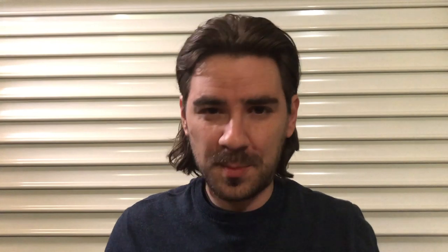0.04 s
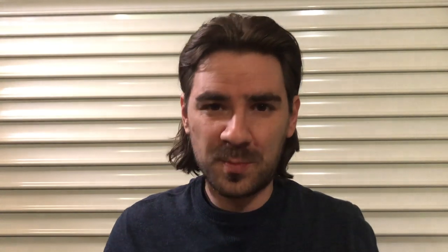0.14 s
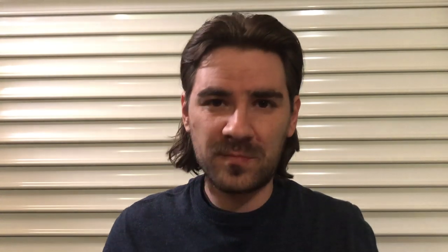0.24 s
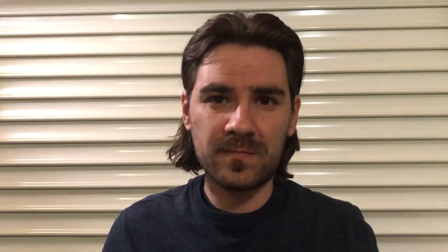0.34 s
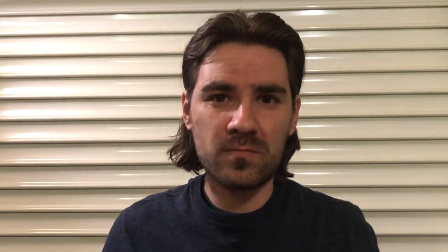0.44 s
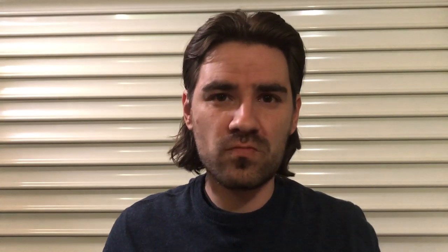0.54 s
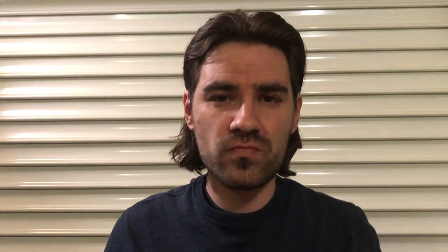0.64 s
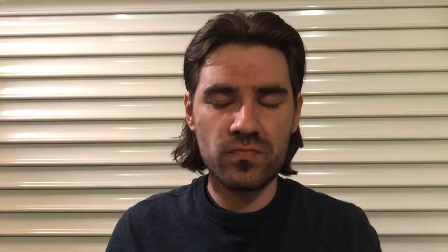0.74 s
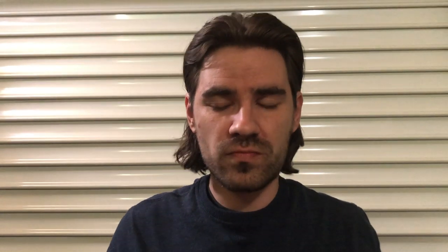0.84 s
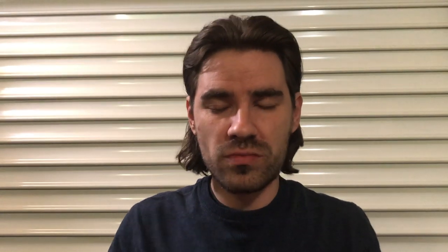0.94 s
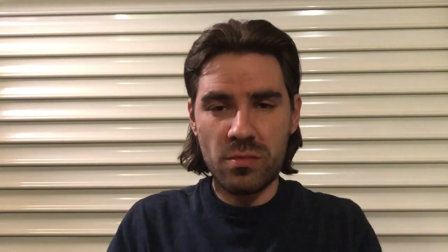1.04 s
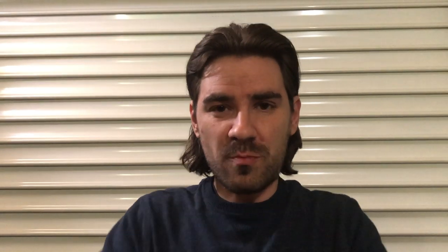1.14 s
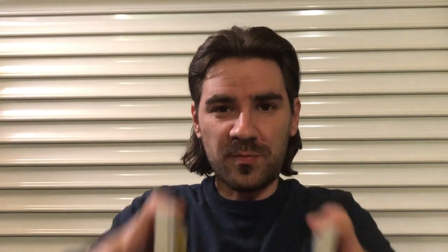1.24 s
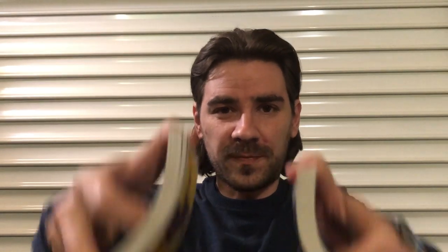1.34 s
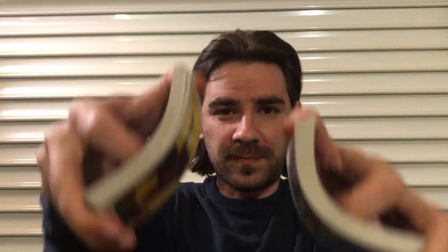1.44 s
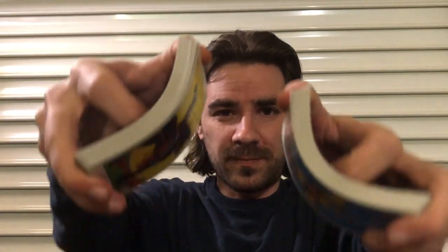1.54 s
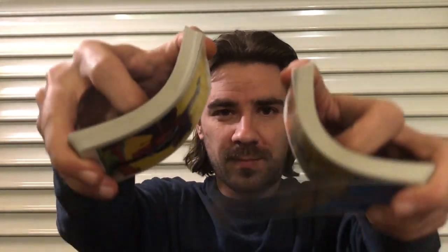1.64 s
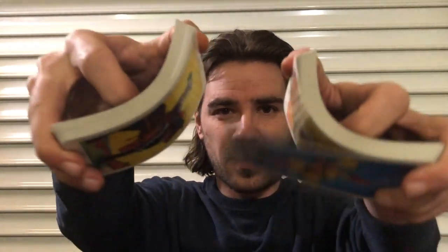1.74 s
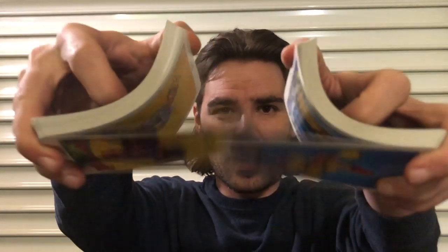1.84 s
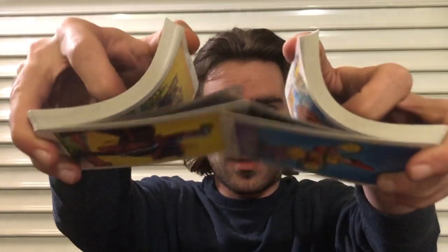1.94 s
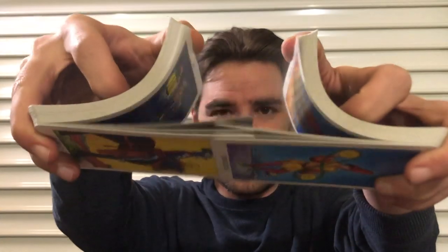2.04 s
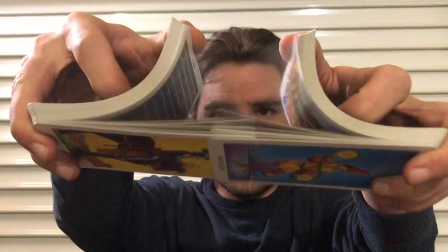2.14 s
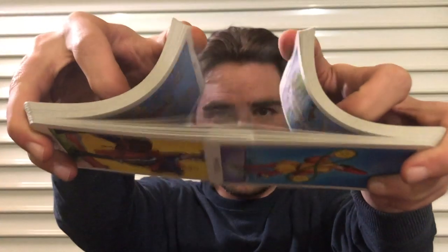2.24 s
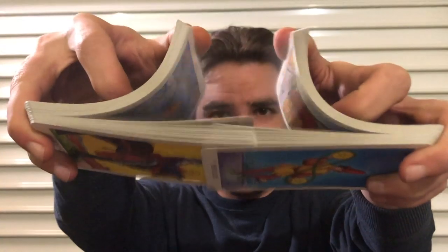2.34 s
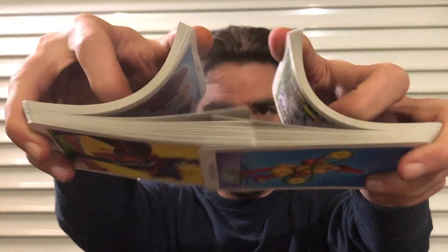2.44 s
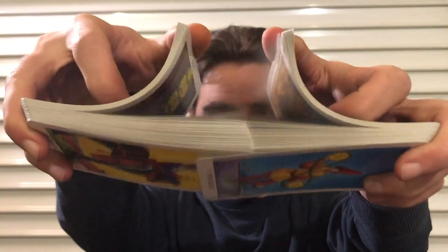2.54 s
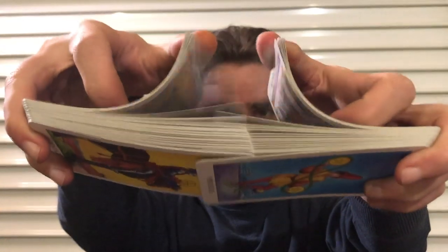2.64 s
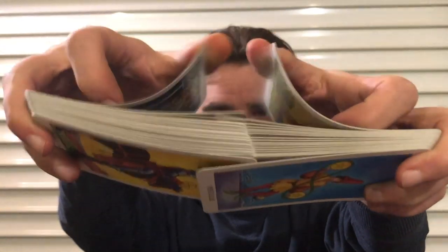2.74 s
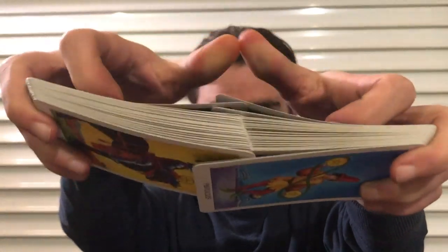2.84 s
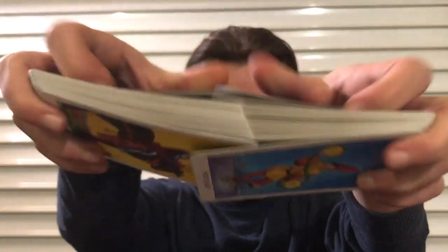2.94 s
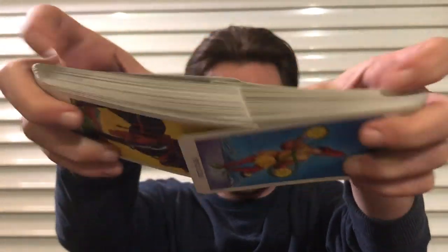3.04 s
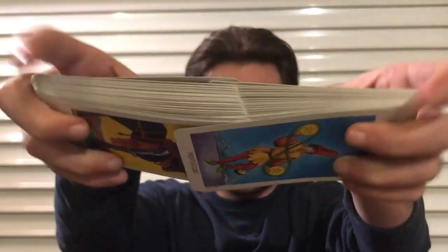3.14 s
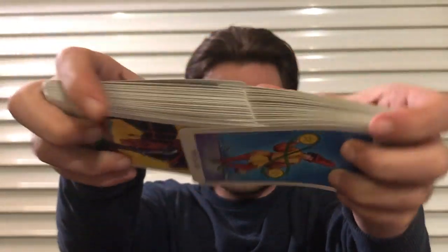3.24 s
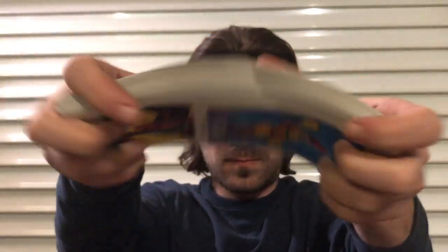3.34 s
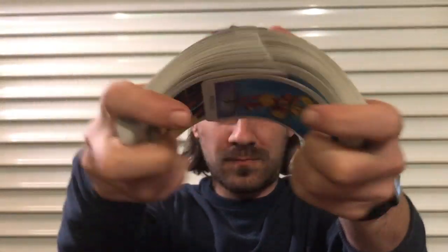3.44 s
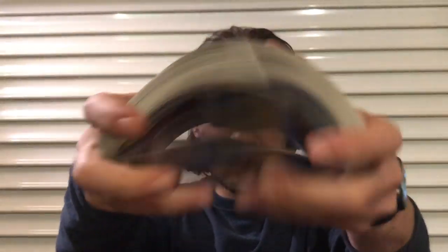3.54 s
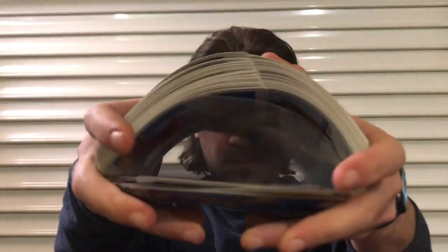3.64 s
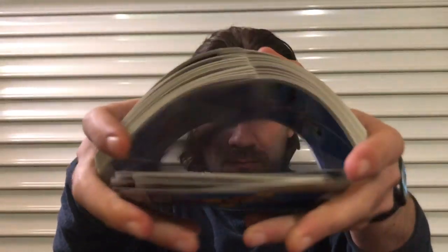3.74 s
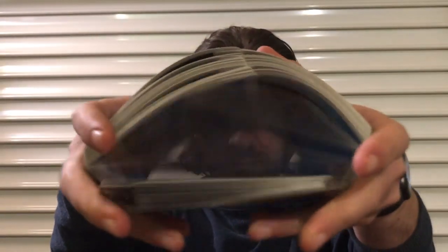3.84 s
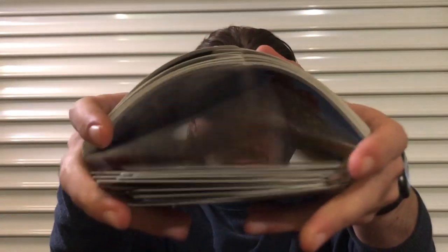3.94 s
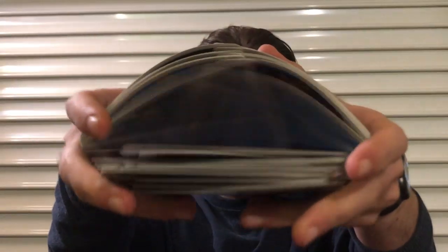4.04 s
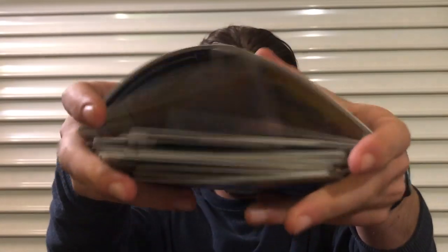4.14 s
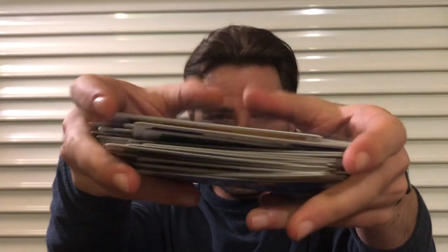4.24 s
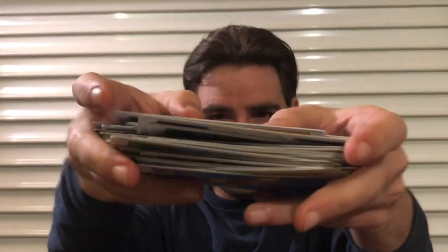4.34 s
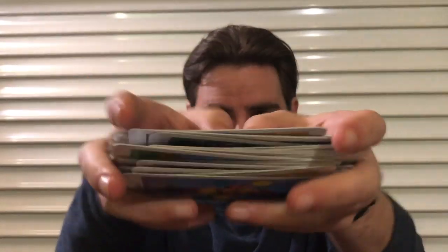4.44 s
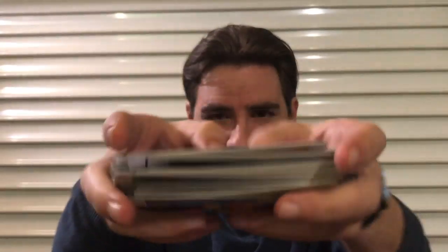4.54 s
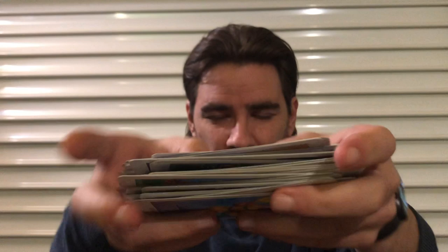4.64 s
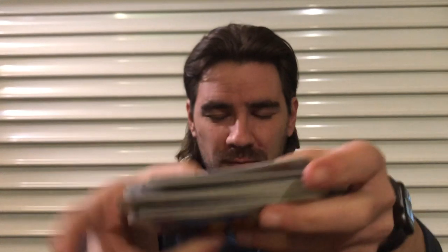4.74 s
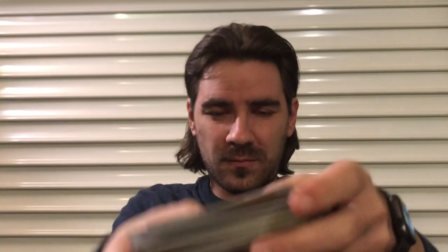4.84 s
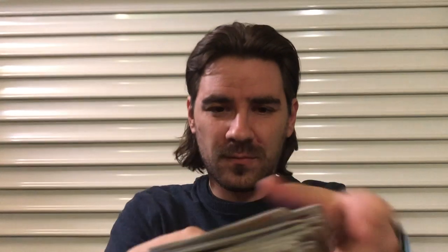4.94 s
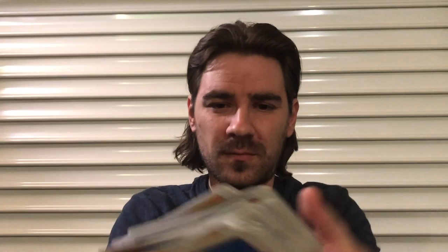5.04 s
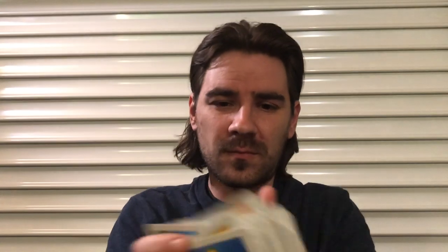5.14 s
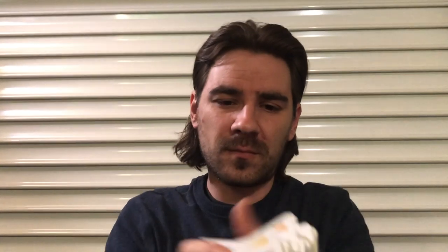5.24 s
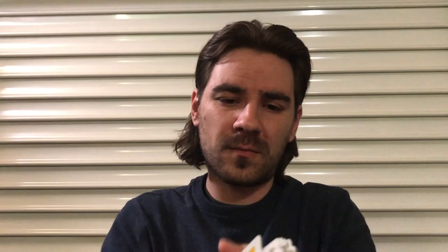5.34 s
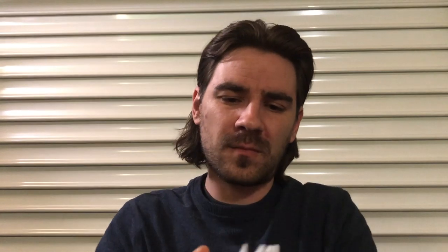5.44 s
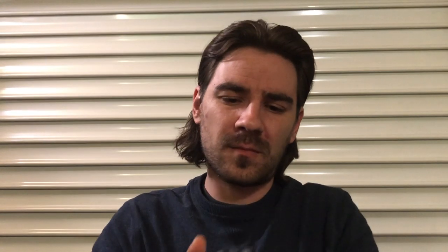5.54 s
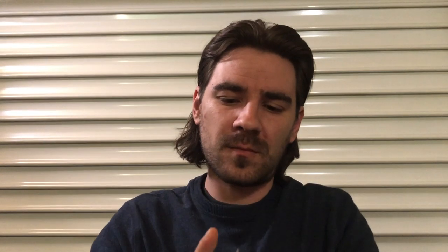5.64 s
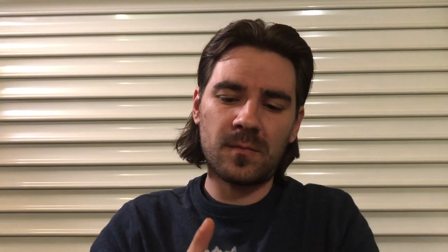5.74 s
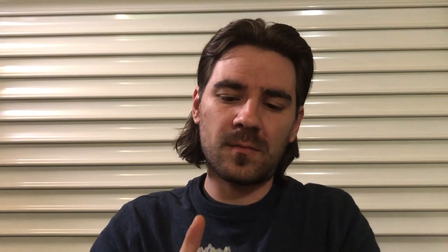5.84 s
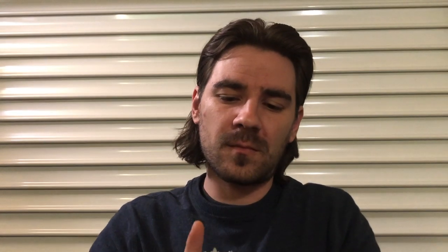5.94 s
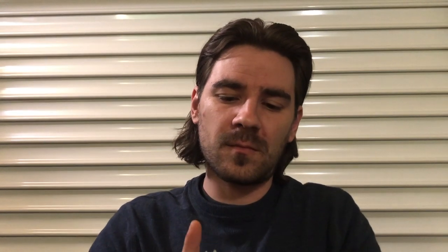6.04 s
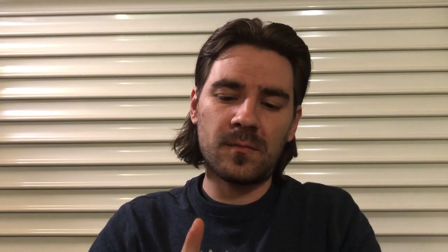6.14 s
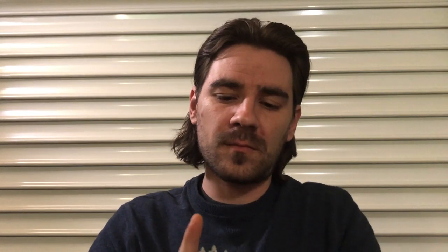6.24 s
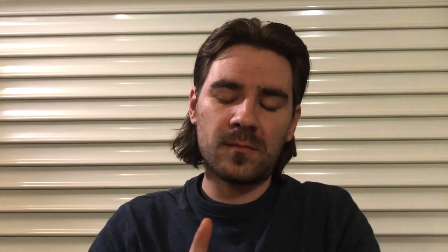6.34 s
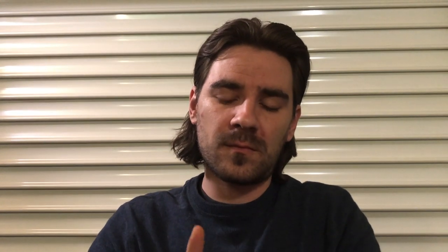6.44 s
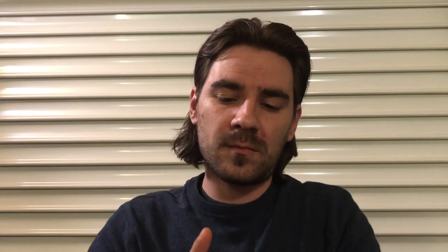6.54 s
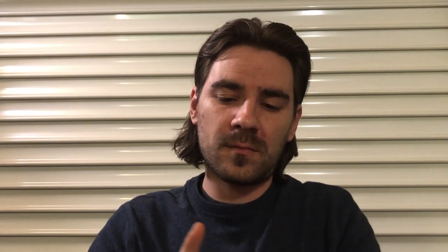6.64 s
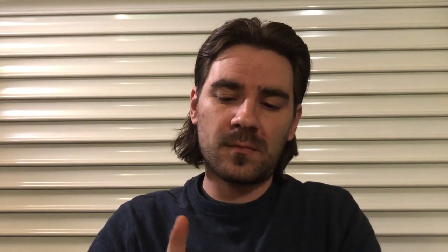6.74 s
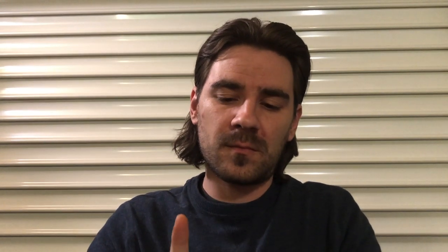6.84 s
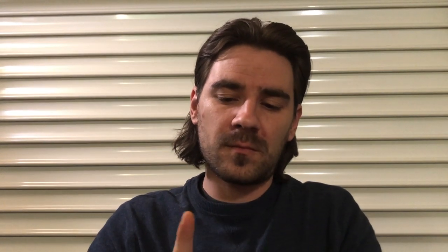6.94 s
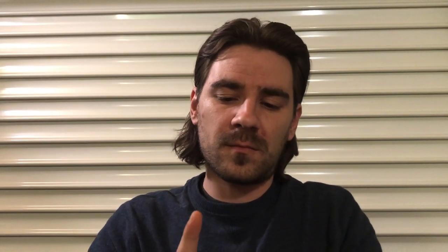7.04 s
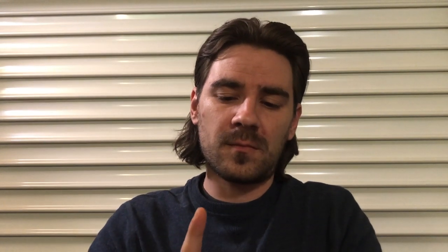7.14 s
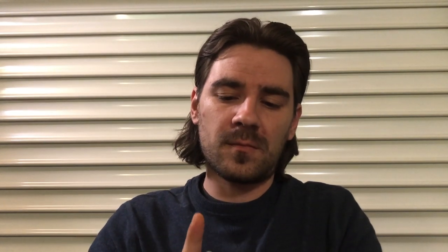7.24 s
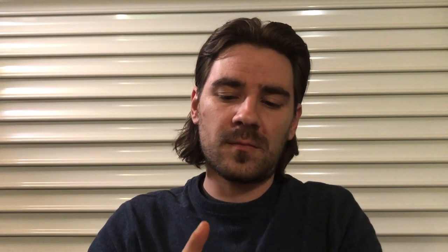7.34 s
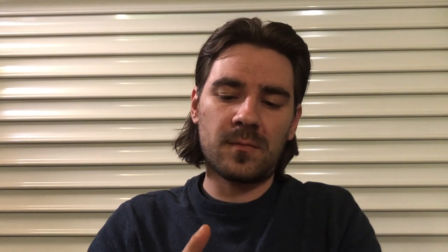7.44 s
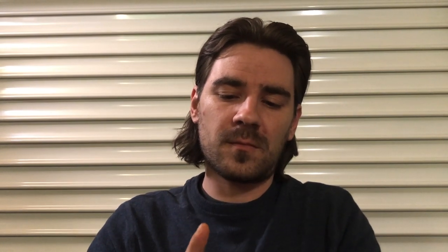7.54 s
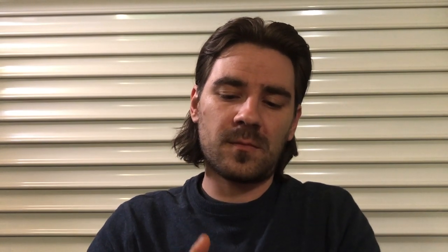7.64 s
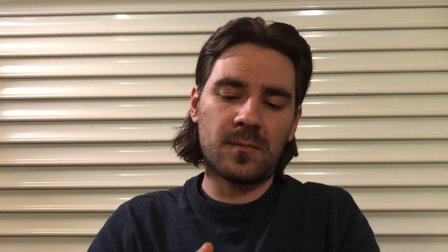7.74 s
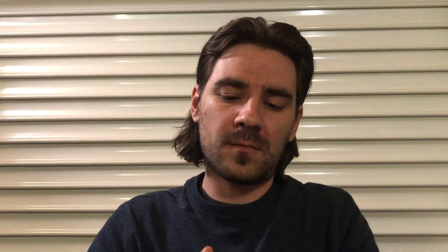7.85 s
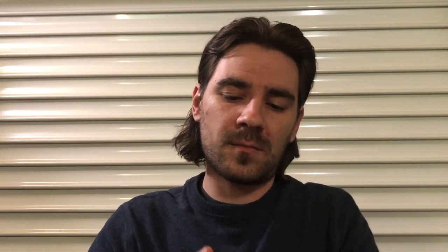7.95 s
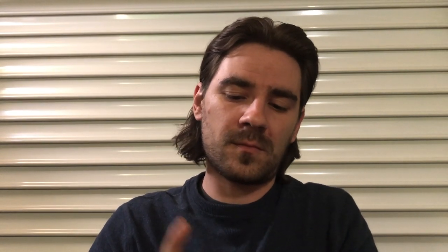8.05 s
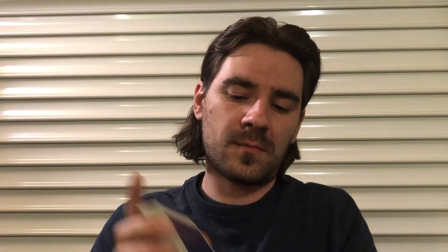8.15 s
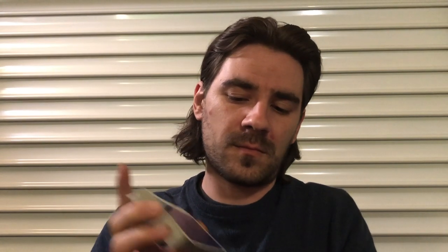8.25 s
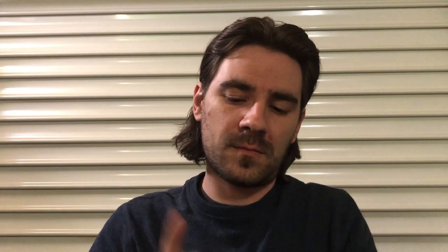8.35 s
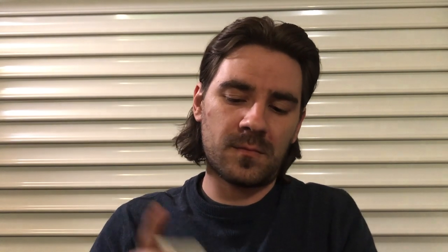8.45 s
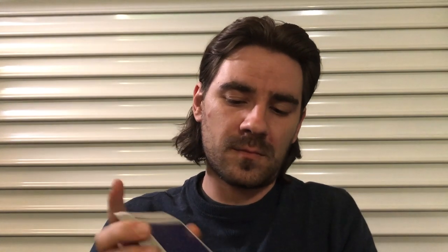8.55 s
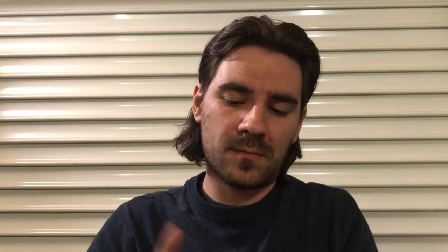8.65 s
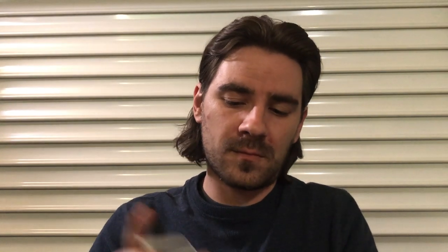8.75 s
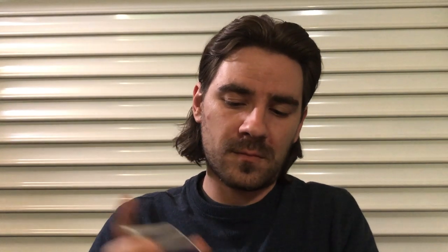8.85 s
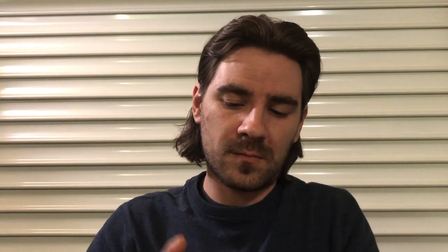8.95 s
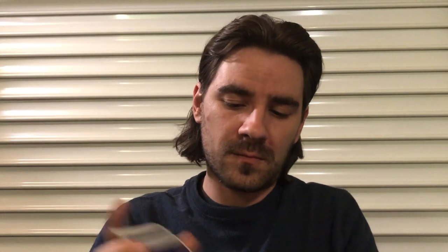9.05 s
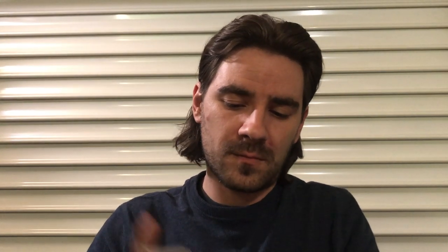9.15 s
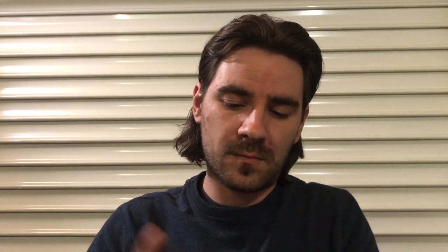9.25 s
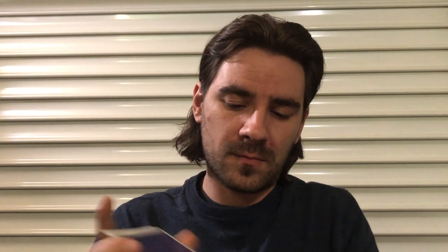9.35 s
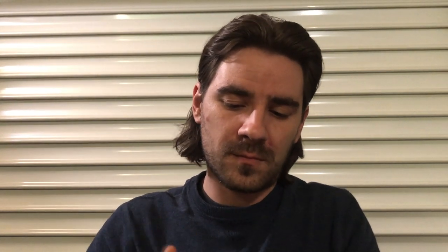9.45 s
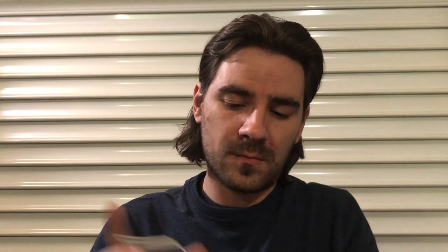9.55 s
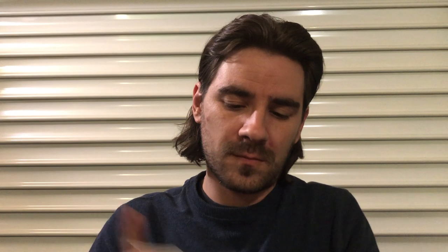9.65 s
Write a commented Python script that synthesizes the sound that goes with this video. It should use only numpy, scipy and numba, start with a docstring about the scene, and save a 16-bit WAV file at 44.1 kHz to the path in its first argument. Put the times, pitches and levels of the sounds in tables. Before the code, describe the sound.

Faint taps over low room rumble and hiss lead to a bright, dense burst of card edges snapping off thumbs. A second burst follows, fuller and papery, as the arch springs closed with a few hard cracks. Gentle rubbing and light taps follow, then quiet. Finally five thin flicks, each with a short gritty slide and parting tick, sound slightly roomier and more distant.

```python
"""A faint whistle and light taps, then a blip as two packets of a tarot deck are bent back and riffled close by.
Card edges scrape and snap free, each click spreading as a bending wave; cards slap the pile and rub.
The deck is arched into a bridge, springs shut with puffs of air and is squared with soft strokes.
Last, further off, five cards are drawn one by one: flick, slide, parting tick, ring of the cupped hand.
A small room answers throughout, over rumble, hiss, hum and a high whine."""
import sys
import numpy as np
from scipy import signal
from scipy.fft import rfft, irfft, next_fast_len
from scipy.io import wavfile
from scipy.ndimage import uniform_filter1d
from numba import njit

SR = 44100
rng = np.random.default_rng(int(sys.argv[2]) if len(sys.argv) > 2 else 0)


def transcribe(signal):
    """Save signal, clipped to [-1, 1], as a 16-bit WAV file at the path in sys.argv[1]."""
    frames = np.atleast_2d(signal).T
    limited = np.clip(frames, -1, 1)
    pcm = np.round(limited * 32767).astype(np.int16)
    wavfile.write(sys.argv[1], SR, pcm)


N = 427769
T = np.arange(N) / SR  # s
SIZE = 4096  # samples in one click
BINS = np.maximum(np.arange(SIZE // 2 + 1) * SR / SIZE, 1)  # Hz


def undb(db):
    """Decibels to gain."""
    return 10 ** (np.asarray(db) / 20)


def on_log(hz, points):
    """Read (Hz, value) points on a log-frequency axis."""
    f, value = np.transpose(points)
    return np.interp(np.log(np.maximum(hz, 1)), np.log(f), value)


def colour(x, points):
    """Filter a sound by (Hz, dB) points."""
    n = next_fast_len(len(x) + SIZE)
    gain = undb(on_log(np.fft.rfftfreq(n, 1 / SR), points))
    return irfft(rfft(x, n) * gain, n)[:len(x)]


def unit(x):
    """Scale to rms 1."""
    return x / np.sqrt(np.mean(x ** 2))


def walk(rate_hz):
    """Smooth random wander of rms 1, with rate_hz new knots per second."""
    knots = rng.standard_normal(4 * SIZE)
    return unit(np.interp(T * rate_hz, np.arange(len(knots)), knots))


def add(out, s, x):
    """Mix x into out from time s."""
    i = int(s * SR)
    out[i:i + len(x)] += x[:N - i]


@njit
def resonator(x, hz, width_hz):
    """Band-pass with a moving centre and gain 1 there."""
    y, band, low = np.empty(len(x)), 0., 0.
    for i in range(len(x)):
        g, k = np.tan(np.pi * hz[i] / SR), width_hz / hz[i]
        v = (band + g * (x[i] + 1e-18 - low)) / (1 + g * (g + k))
        band, low, y[i] = 2 * v - band, low + 2 * g * v, k * v
    return y


def thud(hz, decay_ms):
    """A heavily damped resonance that swells for one decay time; peak near 1."""
    t = T[:SIZE]
    age = t * 1000 / decay_ms
    return age * np.exp(1 - age) * np.sin(2 * np.pi * hz * t)


def bend(spectrum, lag_ms):
    """Bending waves travel as the root of frequency, so a click chirps downwards; lag_ms is the lag at 1 kHz."""
    return irfft(spectrum * np.exp(-4j * np.pi * lag_ms * np.sqrt(BINS / 1000)))


def scrape(length_ms):
    """Spectrum of a brief rough release, evened out to be flat on the whole."""
    ms = np.arange(SIZE) * 1000 / SR
    # the edge takes a moment to roll off the skin, then scrapes on
    grip = (1 - np.exp(-ms / 0.76)) * np.exp(-ms / (length_ms + 0.081))
    burst = rfft(rng.standard_normal(SIZE) * grip)
    return burst / np.sqrt(uniform_filter1d(abs(burst) ** 2, size=200))


# Loudest card edges slipping off the thumbs. Each row: time in seconds, level in dB, scrape length in ms.
RIFFLE = [(1.7965, -20, 3.7), (1.8434, -2.5, 3.2), (1.8866, -3.5, 0.91), (1.9058, 1.6, 7.5),
          (1.9641, 7, 0.61), (1.9945, 1.5, 8.1), (2.0487, 4, 2.7), (2.0857, 3, 3.8), (2.1308, -4.5, 1.8),
          (2.1702, 3, 1.7), (2.188, -8, 0.26), (2.2257, 10.5, 0.82), (2.307, 1, 7.2), (2.3232, -7.5, 0.075),
          (2.358, 4, 0.2), (2.3643, -5, 2.5), (2.4079, 6, .3), (2.426, -3, 3.34), (2.4559, 9.5, 0.4),
          (2.4658, 3, 2.3), (2.5443, 4.5, 4), (2.5628, -1, 0.1), (2.6114, 0.5, 3.8), (2.63, 2, 7.9),
          (2.6781, 0.5, 0.18), (2.7355, -1.5, 3.4), (2.7829, 2, 5.1), (2.7961, -5.5, 1.1),
          (2.8418, -0.5, 0.62)]
# Loudest clumps of cards springing out of the arch. Each row: time in seconds, level in dB, scrape length in ms.
BRIDGE = [(3.5884, 1.5, .4), (3.6139, 2, 3.1), (3.6385, -3.5, 2.6), (3.6603, 0, 1.6), (3.6977, -4, 4),
          (3.7256, 0, 4.4), (3.738, -1, .5), (3.758, -.5, 5), (3.7751, -6.5, 4), (3.8716, -2.5, 1.8),
          (3.8955, 3, 4.7), (3.9125, 13, 0.38), (3.9259, 8, 0.83), (3.9429, 15.5, 0.13), (3.98, 2.5, 4.5),
          (4.0192, -2, 0.53), (4.0484, -5, 3.9), (4.1005, -1, 2.6), (4.1173, 3.5, 2.1), (4.2019, 2.5, 4.5)]
# Spectrum of a snapping edge. Each row: frequency in Hz, gain in dB.
SNAP_COLOUR = [(40, -21), (120, 1.5), (300, -2.5), (700, 0.5), (1400, -1.5), (2300, 1), (4300, -1),
               (7000, 1), (11000, 0), (16000, -3.5)]
BASS_LOSS_DB_PER_DB = 0.5  # a harder snap gains little bass


def snaps(rows, lag_ms, drag_db, bass_db, treble_db, dulling_db, thinning_db_per_s=0):
    """Card edges drag over a finger and slip off; returns the direct sound and what the walls receive.
    Treble falls by dulling_db per doubling of the scrape, bass by thinning_db_per_s; negative values raise it."""
    direct, spread = np.zeros(N), np.zeros(N)
    for s, level_db, length_ms in rows:
        bass = bass_db - BASS_LOSS_DB_PER_DB * level_db - thinning_db_per_s * (s - rows[0][0])
        treble = treble_db - dulling_db * np.log2(length_ms)
        tilt = on_log(BINS, [(650, bass), (1700, 0), (3400, 0), (8000, treble)])
        tone = undb(level_db + tilt + on_log(BINS, SNAP_COLOUR))
        add(direct, s - .0007, bend(scrape(length_ms) * tone, lag_ms))
        # the drag swells up to the moment of release
        drag = undb(drag_db) * irfft(scrape(2.5) * tone)[:SIZE // 4]
        add(direct, s - len(drag) / SR, drag[::-1])
        # summed over all directions, the ripple in the scrape's spectrum evens out
        add(spread, s, bend(tone, lag_ms))
    return direct, spread


# Packets interleaving, then the arch running down. Each row: start in seconds, end in seconds,
# first level in dB, last level in dB.
SLIDES = [(1.899, 2.833, -57, -47), (3.589, 4.22, -38.5, -42)]


def pressure(start_s, end_s, first_db, last_db):
    """A slide starts and stops abruptly and swells or fades evenly in between."""
    gain = undb(np.interp(T, [start_s, end_s], [first_db, last_db]))
    return uniform_filter1d(gain * (T > start_s) * (T < end_s), size=130)


# Spectrum of card rubbing on card. Each row: frequency in Hz, gain in dB.
RUB_COLOUR = [(40, -10.5), (200, 0.5), (600, -7.5), (1200, -0.5), (2400, 0.5), (4500, 0), (8000, 0.5),
              (12000, -0.5), (16000, -10.5)]


def friction(grain, patchy_db):
    """Paper fibres catch and let go: dense grains of uneven size under wavering pressure."""
    grains = rng.standard_normal(N) * np.exp(grain * walk(1500))
    return unit(colour(grains, RUB_COLOUR) * undb(patchy_db * walk(110)))


# Hollow between the two packets. Each row: time in seconds, lowest resonance in Hz.
HOLLOW = [(1.85, 1380), (2.0, 1500), (2.23, 1410), (2.46, 1770), (2.8, 1810)]
# Its modes. Each row: multiple of the lowest resonance, width in Hz, level in dB at the start of the riffle,
# level in dB at its end.
HOLLOW_MODES = [(1, 99.84, 7.5, -12), (1.62, 140.1, -0.5, 1.5)]


def shuffle(riffle, bridge, wobble=0.075):
    """Snaps and rubbing ring the hollow between the flexing packets, then the air under the arched deck."""
    hz = np.interp(T, *np.transpose(HOLLOW)) * (1 + wobble * walk(30))
    hollow = 0
    for multiple, width_hz, first_db, last_db in HOLLOW_MODES:
        gain = undb(np.interp(T, SLIDES[0][:2], [first_db, last_db]))
        hollow = hollow + gain * resonator(riffle, hz * multiple, width_hz * 1.)
    arch = resonator(bridge, np.full(N, 275.), 110.)
    return riffle + hollow + bridge + undb(-1.5) * arch


# Spectrum of a card slapping the pile. Each row: frequency in Hz, gain in dB.
SLAP_COLOUR = [(25, -14.5), (55, -3), (110, 0.5), (260, 3.5), (700, -7), (1500, -9.5), (3000, -17),
               (12000, -31)]
FALL_S, FALL_SPREAD_S = 0.022, 0.002  # mean and rms spread of the fall
SLAP_FOLLOW_DB_PER_DB = 0.76  # slap level per snap level


def slaps(lag_ms, db):
    """Each card freed in the riffle lands on the pile a moment later: a dull, slow chirp."""
    out = np.zeros(N)
    for (s, level_db, _), late in zip(RIFFLE, rng.standard_normal(len(RIFFLE))):
        force = undb(db + SLAP_FOLLOW_DB_PER_DB * level_db + on_log(BINS, SLAP_COLOUR))
        add(out, s + FALL_S + FALL_SPREAD_S * late, bend(force, lag_ms))
    return out


def flutter(span, rate_hz, slap_db, tick_db, spread_db):
    """Lighter cards tick and flap down between the loud ones, at random moments in evenly spaced slots."""
    out = np.zeros(N)
    start_s, end_s = span[:2]
    for k, (when, size, lag) in enumerate(rng.random((100, 3))):
        s = start_s + (k + when) / rate_hz
        edge = scrape(0.1 + 2 * lag)
        if s < end_s:
            slap = undb(slap_db + spread_db * size + on_log(BINS, SLAP_COLOUR))
            tick = edge * undb(tick_db + spread_db * size + on_log(BINS, SNAP_COLOUR))
            add(out, s, bend(slap, 2 + 2 * lag))
            add(out, s, bend(tick, 1.2))
    return out


def rasp(start_s, end_s, fade_s, hz, width_hz, db):
    """Midway through the riffle each stiffly bent edge scratches brightly along the thumb as it snaps free."""
    drag = sum(undb(level_db) * (T > s) * np.exp(-abs(T - s) / fade_s)
               for s, level_db, _ in RIFFLE if start_s < s < end_s)
    scratch = resonator(friction(grain=0.7, patchy_db=2.0), np.full(N, hz * 1.), width_hz * 1.)
    return undb(db) * drag * unit(scratch)


# Air squeezed out as the bridge closes. Each row: time in seconds, level in dB, pitch in Hz.
PUFFS = [(4.142, -37, 89.5), (4.261, -35.5, 118), (4.287, -44.5, 230), (4.301, -43.5, 80)]


def puffs(decay_ms):
    """Low, quickly damped pushes of air from the closing deck."""
    out = np.zeros(N)
    for s, db, hz in PUFFS:
        add(out, s, undb(db) * thud(hz, decay_ms))
    return out


def squeak(s, length_s, low_hz, high_hz, rough, db):
    """A brief, rough rising blip as the packets are bent back."""
    hz = np.interp(T, [s, s + length_s], [low_hz, high_hz])
    push = np.exp(-(2 * (T - s) / length_s - 1) ** 2) * (1 + rough * walk(1100))
    return undb(db) * push * np.sin(2 * np.pi * np.cumsum(hz) / SR)


# Single cards drawn off the deck. Each row: flick time in seconds, slide before it in seconds,
# slide after it in seconds, flick level in dB, flick scrape length in ms, slide level in dB,
# parting tick level in dB, hand resonance in Hz, ring level in dB.
DRAWS = [(8.3947, .016, .089, -5.5, 1.5, -49.5, -21, 1410, -31),
         (8.6681, 0.0021, .1408, -21, 6.6, -49.5, -20.5, 1490, -43.5),
         (8.9293, 0.002, .1175, -13.5, 4, -47.5, -18, 2380, -51),
         (9.2052, 0.0013, 0.089, -5, 0.31, -46.5, -21.5, 2740, -22),
         (9.458, 0.0034, 0.11, -13, 1.16, -53, -22, 980, -30.5)]
# Light taps as the deck is gripped and turned over. Each row: time in seconds, tick level in dB,
# hand resonance in Hz, ring level in dB.
TAPS = [(0.317, -48, 3520, -51), (0.9866, -29, 2000, -50), (1.62, -23, 636, -43), (3.4927, -12, 686, -40),
        (4.838, -31.5, 3500, -57), (5.1624, -32, 704, -56.5), (5.2882, -21.5, 960, -40.5),
        (5.6263, -27.5, 2700, -48)]
LEAVE_MS = 2.6  # scrape length of a card ticking off the last edge


def handling():
    """Taps on the deck, flicks and parting ticks of drawn cards; direct sound and what the walls receive."""
    flicks = [(s, db, ms) for s, _, _, db, ms, *_ in DRAWS]
    partings = [(s + after_s, db, LEAVE_MS) for s, _, after_s, _, _, _, db, _, _ in DRAWS]
    taps = [(s, db, 1.2) for s, db, *_ in TAPS]
    parts = (snaps(flicks, lag_ms=1.048, drag_db=-18, bass_db=-8.0, treble_db=-8, dulling_db=-1.5,
                   thinning_db_per_s=-8),
             snaps(partings, lag_ms=1.034, drag_db=-3, bass_db=-7, treble_db=-8, dulling_db=-0.5),
             snaps(taps, lag_ms=1.1, drag_db=-12.0, bass_db=-16, treble_db=-7.5, dulling_db=-2.5))
    tone = [(110, -11.5), (240, 4), (420, -0.5), (900, 1), (2800, -0.5), (6000, -0.5), (14000, 0)]
    return [colour(sum(x), tone) for x in zip(*parts)]


RING_CYCLES = 0.7  # decay time in cycles


def cupped_hand():
    """Each tap or flick briefly rings the air trapped under the cards."""
    out = np.zeros(N)
    for s, *_, hz, db in list(TAPS) + list(DRAWS):
        add(out, s, undb(db) * thud(hz, 1000 * RING_CYCLES / hz))
    return out


DRAW_FADE_DB = 8  # loss over one slide


def drawn_slides(db, ring_db, width_hz):
    """A card slides off the deck, gritty and hissing; the rubbing is coloured by the hollow of the hand."""
    rub = colour(friction(grain=0.55, patchy_db=2), [(500, 1.5), (3000, 2), (7000, -2), (14000, 1.0)])
    out = np.zeros(N)
    for s, before_s, after_s, _, _, slide_db, _, hz, _ in DRAWS:
        slide = rub * pressure(s - before_s, s + after_s, slide_db, slide_db - DRAW_FADE_DB)
        out += slide + undb(ring_db) * resonator(slide, np.full(N, hz * 1.), width_hz * 1.)
    return undb(db) * out


# Soft strokes of gripping and squaring the deck. Each row: centre in seconds, half length in seconds,
# level in dB, tilt above 1500 Hz in dB per octave.
SWISHES = [(3.019, 0.05, -55, -2.5), (3.425, 0.11, -60, -3), (3.55, 0.04, -37, 1.5), (4.426, .047, -53, 0),
           (4.59, 0.045, -67.5, -2), (4.916, 0.021, -64.5, -4), (5.186, 0.021, -59.5, 0.5),
           (5.273, .017, -53.5, 0), (5.348, .035, -65.5, 1), (5.779, 0.058, -63, 1.5),
           (5.863, 0.024, -62, 0), (6.05, 0.039, -62, 5), (6.237, .07, -63, 2), (6.35, 0.038, -64, 2.5),
           (6.705, 0.066, -65.5, 3), (8.034, 0.037, -65, -5), (8.116, 0.036, -63, -1),
           (8.223, .035, -68.5, -2.5)]


def swishes():
    """Soft strokes of fine-grained friction swell and fade, each with its own treble tilt."""
    out = np.zeros(N)
    tone = [(300, 2.5), (1500, -1), (4000, 3.5), (12000, 2.0), (16000, 7.5)]
    soft = colour(friction(grain=0.27, patchy_db=2.5), tone)
    for s, half_s, db, tilt in SWISHES:
        during = abs(T - s) < 3 * half_s
        stroke = unit(colour(soft[during], [(1500, 0), (16000, tilt * np.log2(16000 / 1500))]))
        out[during] += undb(db) * stroke * np.exp(-((T[during] - s) / half_s) ** 2)
    return out


def whistle(s, half_s, hz, db):
    """A thin, very faint sine with wandering phase, just before the cards come up."""
    return undb(db) * np.exp(-((T - s) / half_s) ** 2) * np.sin(2 * np.pi * hz * T + walk(40))


# Room decay. Each row: frequency in Hz, time to fall 60 dB in seconds.
ROOM_T60 = [(200, 0.14), (1200, .25), (5000, .26), (15000, 0.13)]
# Spectrum of the room tail. Each row: frequency in Hz, gain in dB.
ROOM_COLOUR = [(60, -1), (250, 0), (600, 1.5), (1500, 0), (2500, 0), (5000, -0.5), (9000, -1), (16000, 3.5)]


def room(x, build_s):
    """A small room: a diffuse noise tail with its own decay time in each band."""
    t = T[:SR // 2]
    noise, f = rfft(rng.standard_normal(len(t))), np.fft.rfftfreq(len(t), 1 / SR)
    centres_hz = np.array(ROOM_T60)[:, 0]
    tail = 0
    for (_, t60_s), share in zip(ROOM_T60, np.eye(len(ROOM_T60))):
        band = on_log(f, list(zip(centres_hz, share)))
        tail = tail + irfft(noise * band, len(t)) * np.exp(-np.log(1000) * t / t60_s)
    tail = colour(tail, ROOM_COLOUR) * (1 - np.exp(-t / build_s))
    return signal.fftconvolve(x, tail / np.sqrt(np.sum(tail ** 2)))[:N]


def moving_room(x, count=4):
    """The hands keep moving, so the pattern of reflections drifts from one shape to another."""
    shares = np.array([walk(14) for _ in range(count)])
    shares /= np.sqrt(np.sum(shares ** 2, axis=0))
    return sum(room(x * share, build_s=0.0014) for share in shares)


# Spectrum of room rumble and microphone hiss. Each row: frequency in Hz, gain in dB.
QUIET = [(15, -38.5), (25, -10), (102, -3.5), (123, -7), (212, -7), (263, -9), (591, -14), (1130, -20.5),
         (7920, -29), (9840, -29.5), (16000, -29.5)]
QUIET_DB = -69.5  # before the low cut in scene()


def background(hum_hz, hum_db, whine_hz, whine_db):
    """Room rumble and microphone hiss, with a wavering hum and a faint high whine of narrow noise."""
    air = unit(colour(rng.standard_normal(N), QUIET)) * undb(QUIET_DB + .5 * walk(8.5))
    hum = np.sin(2 * np.pi * hum_hz * T + walk(1.3)) * undb(hum_db + 2 * walk(1.0))
    whine = unit(resonator(rng.standard_normal(N), np.full(N, whine_hz * 1.), 300.))
    return air + hum + undb(whine_db) * whine


def scene():
    """The shuffle is close and fairly dry; taps and drawn cards are further off, thinner and roomier."""
    riffle = snaps(RIFFLE, lag_ms=1.1, drag_db=-26, bass_db=-0.5, treble_db=0.17, dulling_db=1.7)
    bridge = snaps(BRIDGE, lag_ms=1.4, drag_db=-22, bass_db=3.5, treble_db=-6.0, dulling_db=-0.54,
                   thinning_db_per_s=17.5)
    near, near_spread = map(shuffle, riffle, bridge)

    landings = slaps(lag_ms=3.8, db=-5.5)
    landings += flutter(SLIDES[0], rate_hz=32, slap_db=-12.5, tick_db=-22.5, spread_db=14.5)
    landings += flutter(SLIDES[1], rate_hz=48, slap_db=-12.5, tick_db=-22, spread_db=10.5)

    fibres = friction(grain=0.78, patchy_db=3)
    rub = shuffle(*(fibres * pressure(*row) for row in SLIDES))
    rub += drawn_slides(db=-1.5, ring_db=-4.5, width_hz=520) + swishes()
    rub += rasp(start_s=2.34, end_s=2.44, fade_s=.022, hz=6650, width_hz=1300, db=-37.5)

    small = cupped_hand() + squeak(s=1.684, length_s=0.01, low_hz=572, high_hz=1450, rough=.6, db=-44)
    far, far_spread = handling()

    to_walls = undb(-6.0) * near_spread + undb(-8.5) * landings + undb(-3.5) * far_spread
    to_walls += undb(-7) * small + undb(-5.5) * rub

    quiet = background(hum_hz=102.4, hum_db=-77.0, whine_hz=9860, whine_db=-87.0)
    quiet = colour(quiet, [(20, -15.5), (50, 1)])
    quiet += whistle(s=1.19, half_s=0.17, hz=1170, db=-73)
    direct = near + landings + far + small + rub + puffs(decay_ms=3.5)
    return (direct + moving_room(to_walls) + quiet)[None]


TOP_HZ = 15900


def record(dry):
    """The phone rounds the sharpest peaks and cuts the top."""
    rounded = np.tanh(1.3 * dry) / 1.3
    return signal.sosfilt(signal.ellip(10, .2, 70, TOP_HZ, fs=SR, output="sos"), rounded)


dry = scene()
out = record(dry)
transcribe(out)
```